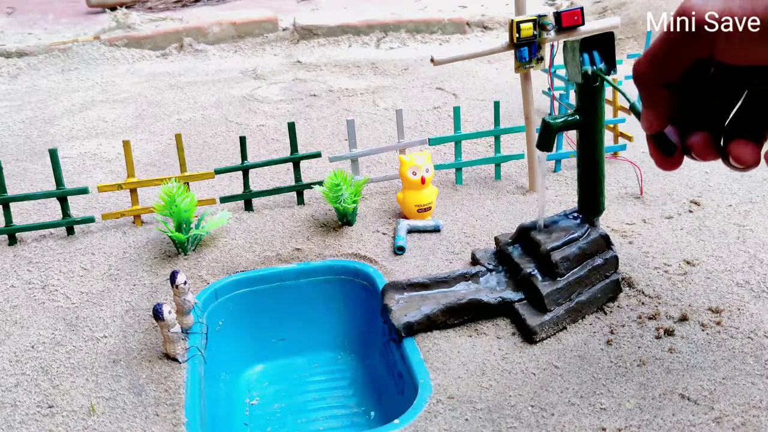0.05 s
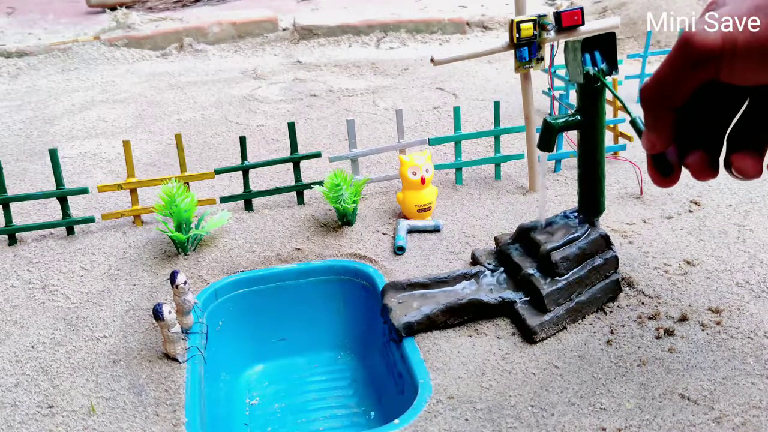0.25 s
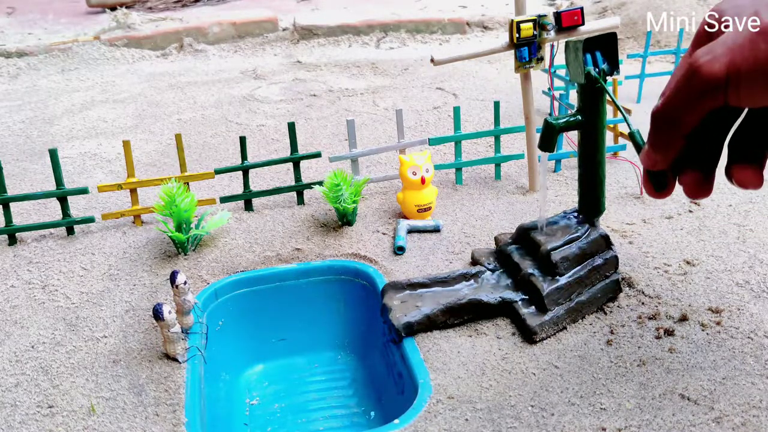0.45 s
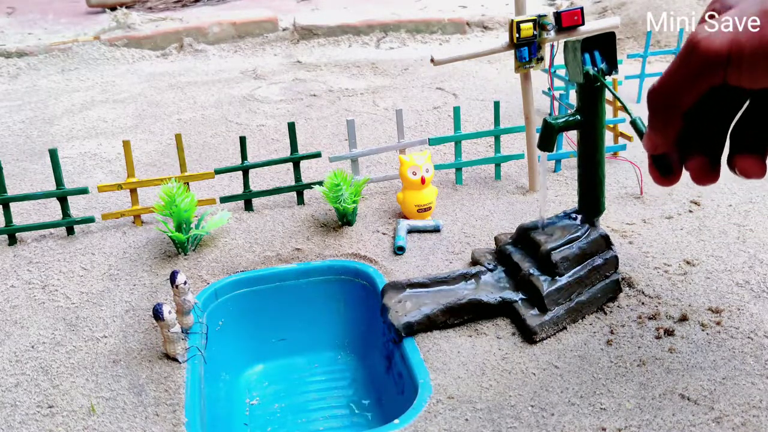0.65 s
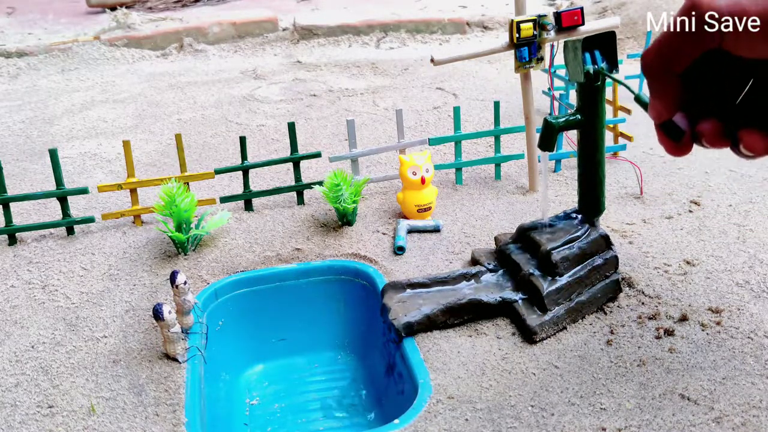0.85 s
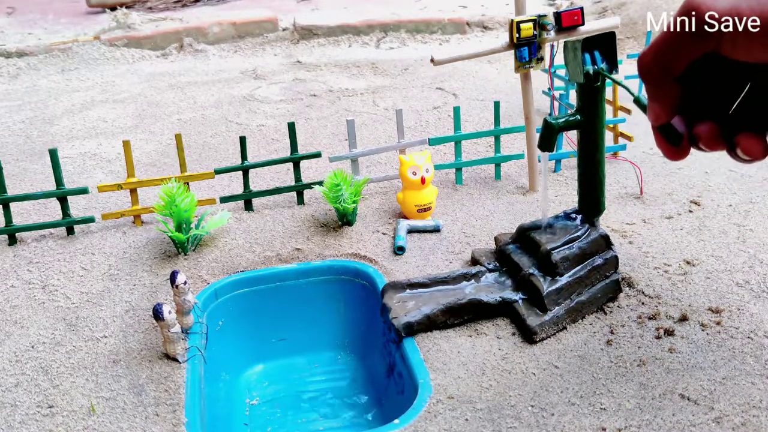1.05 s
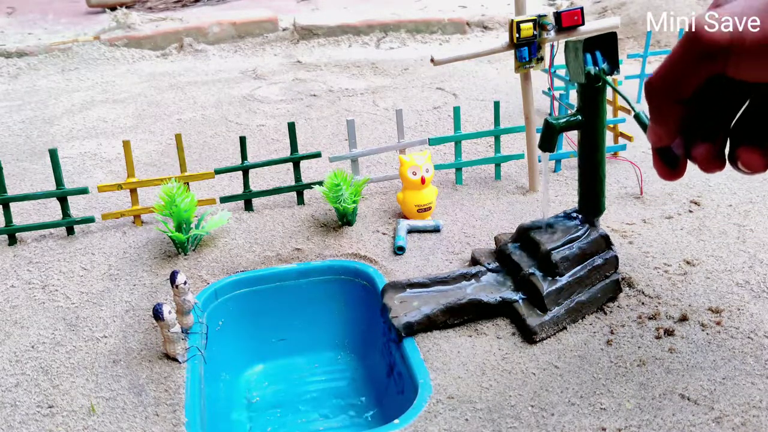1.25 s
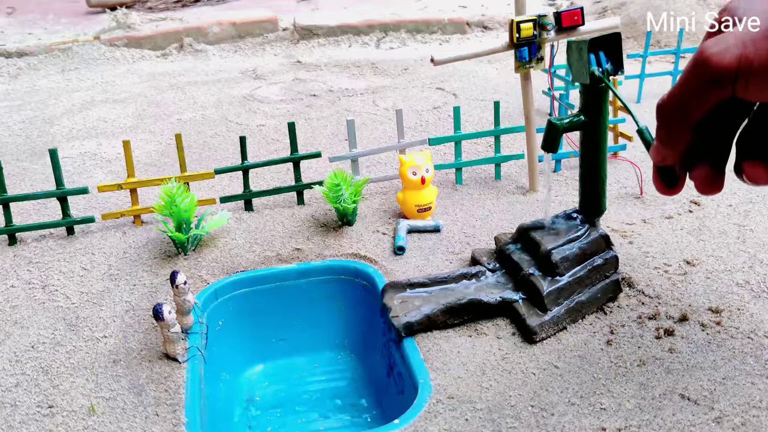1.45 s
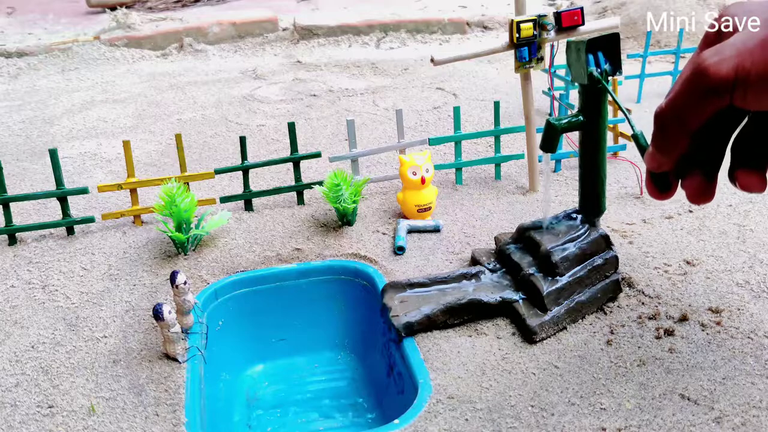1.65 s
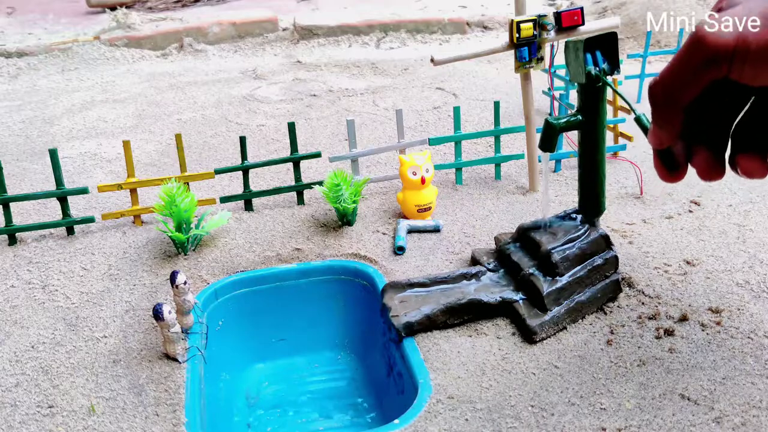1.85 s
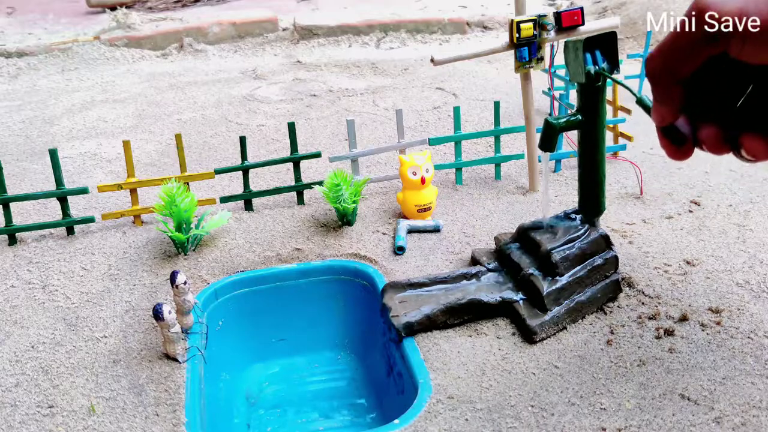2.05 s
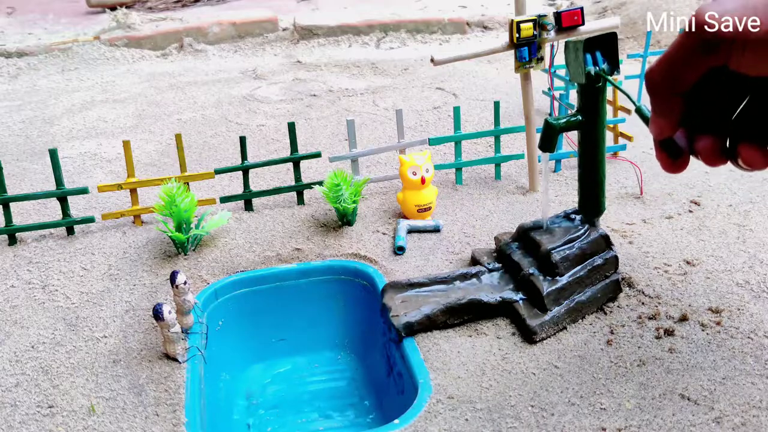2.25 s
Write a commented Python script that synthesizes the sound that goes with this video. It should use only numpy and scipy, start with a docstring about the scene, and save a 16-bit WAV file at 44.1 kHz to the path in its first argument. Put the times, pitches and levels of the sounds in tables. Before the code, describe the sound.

A toy hand pump rubs grittily and squeaks once, then its loose lever clatters with small metal clinks and spattering water. After a short lull, a second stroke rattles and spatters. The microphone is close.

```python
"""First comes a gritty rubbing and one squeak: the pivot of a toy pump, worked twice by hand.
On each stroke the loose lever clatters against the barrel, shaking the stand and ringing small
metal parts, and water spatters. A faint whine wavers in the quiet between strokes.
A phone close by flattens the blows with its limiter, which turns loud moments down."""
import sys
import numpy as np
from scipy import signal
from scipy.fft import rfft, irfft
from scipy.io import wavfile
from scipy.ndimage import uniform_filter1d, minimum_filter1d

SR = 44100
rng = np.random.default_rng(int(sys.argv[2]) if len(sys.argv) > 2 else 0)


def to_wav(sig):
    """Store sig (one row per channel, or 1-D mono) as 16-bit WAV at the path in sys.argv[1].

    Samples outside -1..1 are clipped; the rate is SR.
    """
    pcm = np.clip(np.atleast_2d(sig), -1, 1) * 32767
    pcm = np.round(pcm).astype(np.int16)
    wavfile.write(sys.argv[1], SR, pcm.T)  # frames by channels


N = 105840
T = np.arange(N) / SR

# Levels are relative. A ring_s is the time a sound takes to fade by 60 dB.
# tone of the quiet air: frequency_hz, level_db
AIR_SPECTRUM = [(18, -70), (30, -85), (81, -4.5), (170, -24.5), (355, -21), (426, -16), (473, -10),
                (526, -26), (2680, -36), (3140, -27), (3400, -32.5), (7270, -28), (11100, -49),
                (16000, -84)]
# path of the faint whine: time_s, pitch_hz, level_db
WHINE_PATH = [(0, 443, -54.5), (0.134, 490, -52), (.22, 520, -75), (0.29, 485, -45), (0.345, 438, -48),
              (.42, 425, -55), (1.029, 450, -67.5), (1.2, 478, -48), (1.331, 487, -56), (1.447, 440, -60),
              (2.2, 420, -55), (2.4, 478, -50)]
# tone of the rubbing pivot: frequency_hz, level_db
RUB_SPECTRUM = [(410, -31), (700, 21), (1060, -4), (1840, -2.5), (2840, -3.5), (3690, -0.5), (5400, -8),
                (7290, -5), (11400, -19), (15000, -34), (16000, -39)]
# how loudly it rubs: time_s, level_db
RUB_LEVELS = [(0, -51.5), (.06, -43), (.17, -37.5), (.3, -31.5), (.44, -32), (.95, -34), (1.06, -56),
              (1.34, -49.5), (1.45, -41), (1.6, -37), (2.1, -34.5), (2.2, -48), (2.28, -51), (2.4, -55)]
# ticks as the lever takes up its slack: start_s, level_db
SLACK_TICKS = [(0.039, -39), (0.1515, -31), (1.463, -36), (1.624, -45.5), (1.645, -30)]
# swell of the squeak: time_s, lowest_tone_db, overtones_db
SQUEAK_LEVELS = [(0.17, -56, -57), (.21, -33.5, -59), (0.248, -18, -28), (.355, -18.5, -27.5),
                 (0.377, -47, -60)]
# its higher tones: pitch_multiple, level_db
SQUEAK_OVERTONES = [(2, 5), (3, -15.5), (4, -11.5), (5, -11.5), (6, -11.5)]
# blows of the lever: start_s, force_db, stand_thud_db, barrel_knock_db, clank_db, ting_db, tick_db
LEVER_BLOWS = [(0.4592, -6.5, -3, -2, 0.5, -11.5, -32), (0.507, 2.5, -7.5, -13.5, -5.5, -21.5, -37),
               (0.5505, -7, -26, -8.5, 0.5, -8.5, -21.5), (0.568, -6.5, -15, -9, 4.5, -2, -19.5),
               (0.591, -12, -8.5, -8.5, 4, -5.5, -23), (0.603, -17.5, -24, -5, 4, 3, -15.5),
               (0.628, -15, -5, -5.5, -2.5, -15, -35), (0.7155, -1.5, -12.5, -6.5, 0, -14.5, -48),
               (0.742, -13, -11.5, -5, -0.5, -7, -49), (0.752, -8, -23, -5, -19, -16, -53),
               (0.768, -13, -8.5, -19, -2, -7.5, -54), (0.798, -16, -1.5, -25, 2, -4, -29),
               (0.849, -20, -9, -2, 6, -3, -38), (0.876, -13.5, -18, -3, -15, -8, -29),
               (0.886, -5.5, -12, 1, -1.5, -7.5, -35), (0.903, -10, -7.5, -14, 9, 4.5, -20),
               (0.92, -2.5, -20.5, -11, -5, -4, -20), (0.929, -14.5, 0.5, 4, 6.5, -18, -24),
               (1.656, -7.5, -8, 2, 2.5, -4, -45), (1.682, -6.5, -23, -10, -1.5, -3.5, -23.5),
               (1.713, -13.5, -3.5, -17, -17, -3.5, -49), (1.722, -6.5, -2.5, -9, -0.5, -16, -53),
               (1.745, -13.5, 3, -5, -15, -24, -43), (1.797, -9.5, 0.5, -10, -9.5, -15, -39),
               (1.824, -15.5, -6.5, -7, -6, -35, -50), (1.842, -7, -10, -26, -8, -5, -42),
               (1.864, -16.5, 0, 5, 6.5, -5.5, -43), (1.882, -0.5, -11, -9.5, -2, -13, -25.5),
               (1.926, 0.5, -19, -5, -1.5, -14, -45), (1.972, -12.5, -21, -10, -4, -8, -18),
               (1.977, -4.5, -3.5, -7.5, -0.5, -11.5, -26), (2.049, -6, -22, -13, -5.5, -12, -30),
               (2.068, -15.5, 1.5, 1, 4.5, 2, -20), (2.091, -9.5, -5, 0, 10.5, -2, -22),
               (2.101, -13, -1.5, -23, -21, 5.5, -8.5), (2.109, -8.5, -3, -0.5, -2, -4.5, -17.5)]
# the five parts of a blow, from thud to tick: low_hz, high_hz, ring_s, gain_db
BLOW_PARTS = [(149, 740, 0.16, -5), (410, 1670, 0.12, -1.5), (1720, 4140, 0.15, -9.5),
              (4660, 7100, 0.12, -8.5), (8970, 13000, 0.079, 5)]
# tone of the struck pump: frequency_hz, level_db
CLATTER_SPECTRUM = [(40, -13.5), (147, -2), (283, -2.5), (345, 5.5), (382, 0), (516, -13.5), (1300, -5.5),
                    (1810, -14), (2210, -8), (3130, -12.5), (3500, -17.5), (4680, -22), (7730, -28),
                    (8770, -45.5), (12800, -50.5), (16000, -57)]
# notes the pump rings with: pitch_hz, level_db, ring_s
PUMP_NOTES = [(149.2, -16.5, 0.25), (349.6, -2.5, 0.21), (572.2, -18, 0.11), (1320, -17.5, 0.19),
              (1972, -19, 0.29), (2830, -10, 0.091), (3130, -6, 0.11)]
# blows that set one part ringing strongly: start_s, pitch_hz, level_db, ring_s
STRONG_PINGS = [(.4592, 573, -7.5, 0.14), (.507, 341, 0, 0.12), (.768, 7060, -21, 0.093),
                (.886, 3740, -12, 0.23), (.929, 348.5, -11.5, 0.19), (.929, 1717, -8.5, 0.089),
                (.929, 1872, -15.5, 0.17), (1.656, 568, -4.5, 0.073), (1.682, 6170, -6, 0.09),
                (2.049, 7630, -9.5, 0.083), (2.109, 1270, -7.5, 0.086)]
# heavy landings: start_s, level_db
LANDINGS = [(0.508, -12), (0.93, -31), (1.711, -18.5), (2.109, -11)]
# clinks of the loose link: start_s, level_db
LINK_CLINKS = [(0.5514, -18.5), (0.604, -17.5), (.768, -22), (1.844, -21), (1.882, -11.5), (1.974, -22.5),
               (2.049, -14)]
# notes the link rings with: pitch_hz, level_db
LINK_NOTES = [(2434, -15), (2671, -1), (3062, -7.5), (3822, -10), (4083, -22.5), (5016, -12.5), (6150, -20),
              (6494, -11.5), (7628, -9), (12446, -33)]
# gushes of water: start_s, end_s, loudest_bubble_db
WATER_GUSHES = [(0.562, 0.695, -24.5), (.73, 0.949, -24.5), (1.728, 2.124, -23.5)]
# clacks against the lever's stop: start_s, level_db
STOP_CLACKS = [(0.715, -7.5), (.8762, -7), (1.9255, -1.5), (1.977, -3.5)]


def amp(db):
    """Turn decibels into a gain."""
    return 10 ** (np.asarray(db) / 20)


def unit(x):
    """Scale a signal to an average power of 1."""
    return x / np.sqrt(np.mean(x ** 2))


def noise(spectrum, low_hz=20, high_hz=20000):
    """Noise with a given tone, cut steeply below and above two edges."""
    f = np.fft.rfftfreq(N, 1 / SR) + 1e-3
    hz, db = np.array(spectrum).T
    tone = amp(np.interp(np.log(f), np.log(hz), db))
    edges = 1 / np.sqrt((1 + (low_hz / f) ** 12) * (1 + (f / high_hz) ** 12))
    return unit(irfft(rfft(rng.standard_normal(N)) * tone * edges, N))


def wander(rate_hz):
    """A smooth random wobble, about 1 in size."""
    hold = int(SR / rate_hz)
    steps = np.repeat(rng.standard_normal(N // hold + 1), hold)
    return unit(uniform_filter1d(steps, hold)[:N])


def add(out, start_s, sound):
    """Mix a sound in at a given time."""
    i = int(start_s * SR)
    out[i:i + len(sound)] += sound[:N - i]


def ring(t, hz, ring_s, phase=0):
    """One pure note that fades away."""
    return np.sqrt(2) * np.sin(2 * np.pi * hz * t + phase) * np.exp(-np.log(1000) * t / ring_s)


def roughen_treble(x, depth_db=6, spacing_hz=110):
    """Break the treble of a noise into many ringing peaks, placed anew each time."""
    f = np.fft.rfftfreq(len(x), 1 / SR)
    ripple = np.interp(f / spacing_hz, np.arange(256), rng.standard_normal(256))
    ripple *= np.minimum(f / 2000, 1)
    return irfft(rfft(x) * unit(amp(depth_db * ripple)), len(x))


def background(air_db=-50, waver=0.014):
    """Quiet air and a faint, wavering whine."""
    times, hz, db = np.array(WHINE_PATH).T
    pitch_hz = np.interp(T, times, hz) * (1 + waver * wander(60.4))
    phase = 2 * np.pi * np.cumsum(pitch_hz) / SR
    whine = np.sqrt(2) * amp(np.interp(T, times, db) + 1.96 * wander(30.44)) * np.sin(phase)
    return whine + amp(air_db + 0.3 * wander(37)) * noise(AIR_SPECTRUM)


def pivot_rub(gain_db=-3.5, grit_db=2.5, tick_s=0.0076):
    """The pivot slides grittily and ticks as the lever takes up its slack."""
    times, levels_db = np.array(RUB_LEVELS).T
    level = amp(np.interp(T, times, levels_db) + gain_db + grit_db * wander(250))
    for start, db in SLACK_TICKS:
        add(level, start, amp(db) * np.exp(-T / tick_s))
    return level * noise(RUB_SPECTRUM, low_hz=1217)


def pivot_squeak(pitch_hz=1381, waver=0.0016):
    """The pivot sticks and slips at a nearly steady pitch; overtones grow as it takes hold."""
    times, lowest_db, overtones_db = np.array(SQUEAK_LEVELS).T
    phase = 2 * np.pi * np.cumsum(pitch_hz * (1 + waver * wander(156))) / SR
    swell = lambda db: amp(np.interp(T, times, db, left=-120, right=-120))
    overtones = sum(amp(db + wander(42.3)) * np.sin(k * phase) for k, db in SQUEAK_OVERTONES)
    return np.sqrt(2) * (swell(lowest_db) * np.sin(phase) + swell(overtones_db) * overtones)


def lever_clatter(crack_db=-3, crack_s=0.0031, scatter_db=4, ping_db=-3.5):
    """Each blow is a crack, a noisy ring and clear notes; where it lands sets the mix of its parts."""
    out, t = np.zeros(N), T[:SR // 3]
    share = 0.31  # how much of the noisy ring all blows have in common
    for part, (low_hz, high_hz, ring_s, part_db) in enumerate(BLOW_PARTS):
        common = np.sqrt(share) * noise(CLATTER_SPECTRUM, low_hz, high_hz)[:len(t)]
        varied = np.sqrt(1 - share) * noise(CLATTER_SPECTRUM, low_hz, high_hz)
        rise = 1 - np.exp(-t * high_hz)  # higher parts start more sharply
        fall = np.exp(-np.log(1000) * t / ring_s) + amp(crack_db) * np.exp(-t / crack_s)
        notes = [note for note in PUMP_NOTES if low_hz <= note[0] < high_hz]
        for start, force_db, *mix_db in LEVER_BLOWS:
            own = np.roll(varied, rng.integers(N))[:len(t)]
            blow = roughen_treble(common + own) * fall
            for hz, db, note_s in notes:
                level = amp(db + scatter_db * rng.standard_normal())
                blow += level * ring(t, hz, note_s, rng.uniform(0, 2 * np.pi))
            add(out, start, amp(force_db + mix_db[part] + part_db) * rise * blow)
    for start, hz, db, ring_s in STRONG_PINGS:
        add(out, start, amp(db + ping_db) * ring(t, hz, ring_s))
    return out


def ground_thumps(rise_s=0.0025, fade_s=0.015):
    """Heavy landings thump the ground with a short, deep burst."""
    out, t = np.zeros(N), T[:SR // 3]
    shape = (1 - np.exp(-t / rise_s)) * np.exp(-t / fade_s)
    for start, db in LANDINGS:
        add(out, start, amp(db) * shape * noise(CLATTER_SPECTRUM, 50, 157)[:len(t)])
    return out


def link_clinks(ring_s=0.17, detune=0.0015, scatter_db=2):
    """A loose metal link rings with the same notes each time, a little detuned by how it sits."""
    out, t = np.zeros(N), T[:SR // 3]
    for start, clink_db in LINK_CLINKS:
        for hz, db in LINK_NOTES:
            loudness, shift, side = rng.standard_normal(3)
            gain = np.sign(side) * amp(clink_db + db + scatter_db * loudness)
            add(out, start, gain * ring(t, hz * (1 + detune * shift), ring_s))
    return out


def water_spatter(bubbles_per_gush=110, low_hz=846, high_hz=3910, spread_db=11, ring_cycles=36):
    """Water spatters in the barrel on each stroke: a quick patter of small, short bubbles."""
    out, t = np.zeros(N), T[:SR // 10]
    for start, end, loudest_db in WATER_GUSHES:
        for when, smallness, softness in rng.random((bubbles_per_gush, 3)):
            hz = low_hz * (high_hz / low_hz) ** smallness
            bubble = amp(loudest_db - spread_db * softness) * ring(t, hz, ring_cycles / hz)
            add(out, start + when * (end - start), bubble)
    return out


def stop_clacks(rise_s=0.00025, fade_s=0.0025):
    """The lever hits its stop with a dry clack."""
    out, t = np.zeros(N), T[:SR // 3]
    shape = (1 - np.exp(-t / rise_s)) * np.exp(-t / fade_s)
    for start, db in STOP_CLACKS:
        add(out, start, amp(db) * shape * noise(CLATTER_SPECTRUM, 410, 3400)[:len(t)])
    return out


def scene():
    """The pump over its quiet background, in one channel."""
    hits = lever_clatter() + link_clinks() + stop_clacks() + ground_thumps()
    return (hits + water_spatter() + pivot_squeak() + pivot_rub() + background())[None]


def record(dry):
    """The phone's limiter turns down just before loud blows and recovers fast; bass and top are trimmed."""
    limit_db, recover_db_per_s = -12.5, 437
    sense_samples, ahead_samples = int(0.0095 * SR), int(0.006 * SR)
    power = np.abs(uniform_filter1d(dry[0] ** 2, sense_samples))
    over_db = np.maximum(10 * np.log10(power + 1e-12) - limit_db, 0)
    recovery_db = recover_db_per_s * T
    cut_db = np.maximum.accumulate(over_db + recovery_db) - recovery_db
    gain_db = uniform_filter1d(minimum_filter1d(-cut_db, ahead_samples), ahead_samples)
    rounded = 0.93 * np.tanh(dry[0] * amp(gain_db) / 0.91)  # softens the remaining peaks
    bass_cut = signal.butter(3, 42, "highpass", fs=SR, output="sos")
    top_cut = signal.ellip(8, .2, 80, 15700, fs=SR, output="sos")
    return signal.sosfilt(top_cut, signal.sosfilt(bass_cut, rounded))[None]


dry = scene()
out = record(dry)
to_wav(out)
```